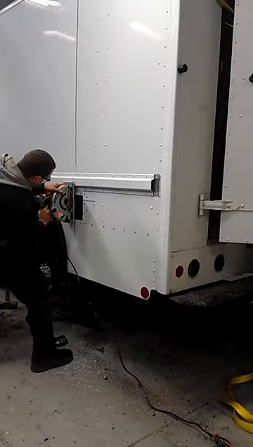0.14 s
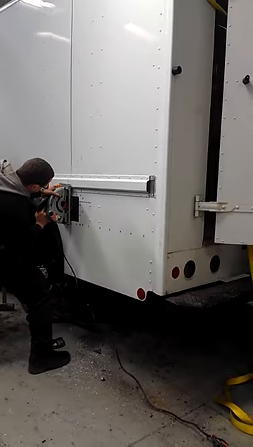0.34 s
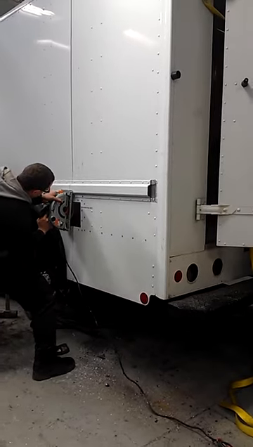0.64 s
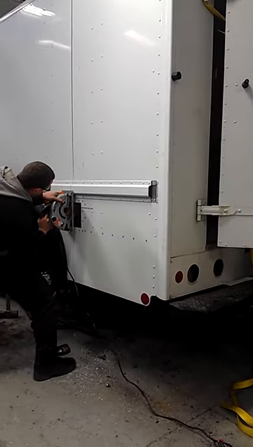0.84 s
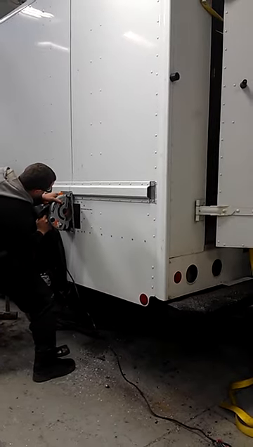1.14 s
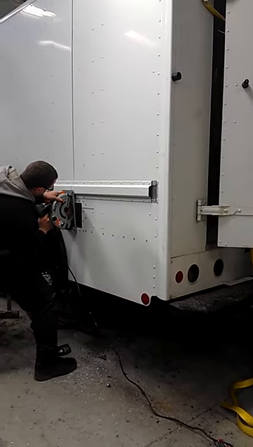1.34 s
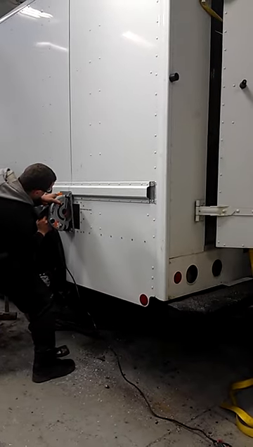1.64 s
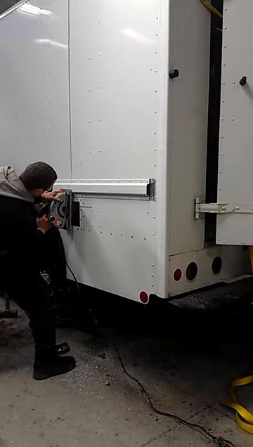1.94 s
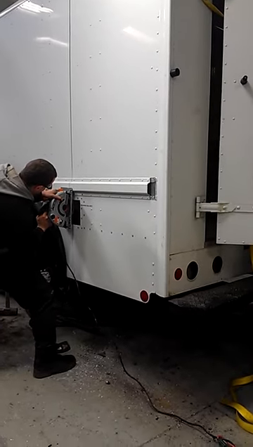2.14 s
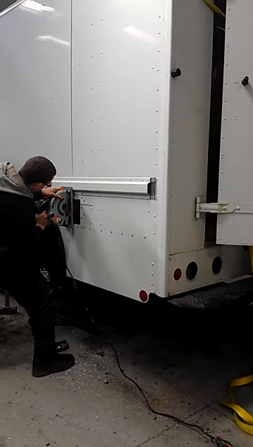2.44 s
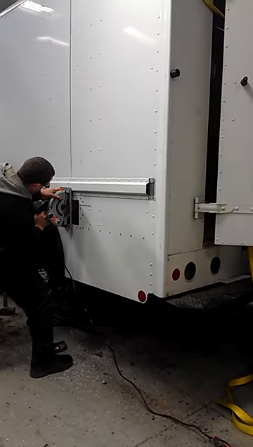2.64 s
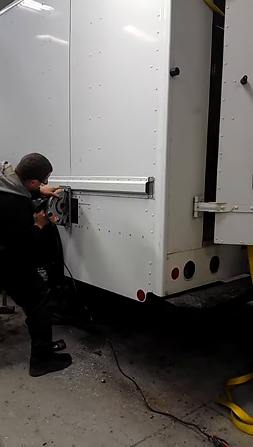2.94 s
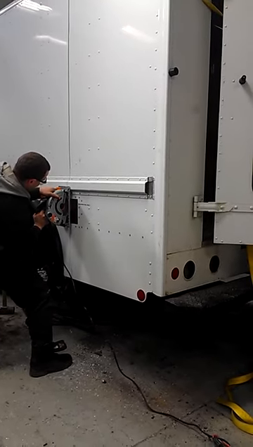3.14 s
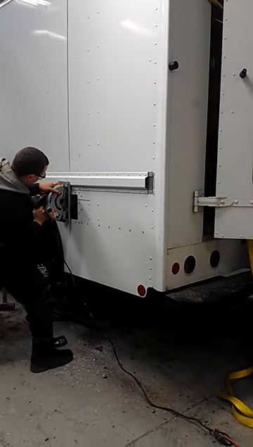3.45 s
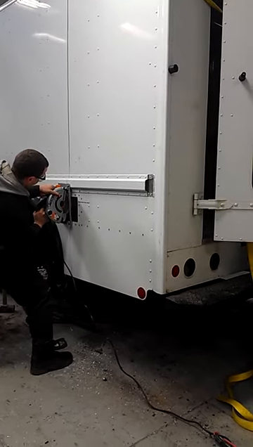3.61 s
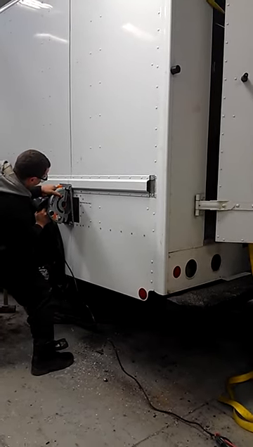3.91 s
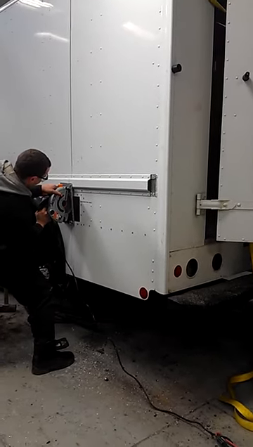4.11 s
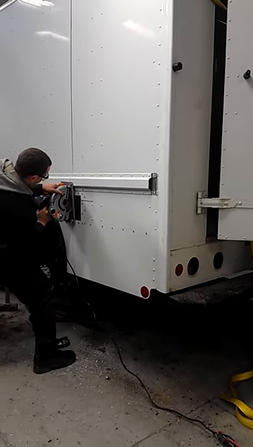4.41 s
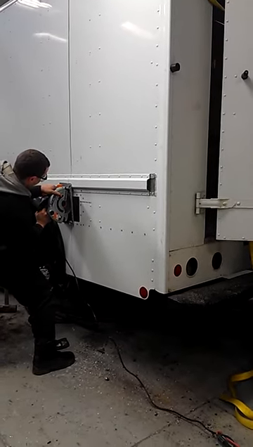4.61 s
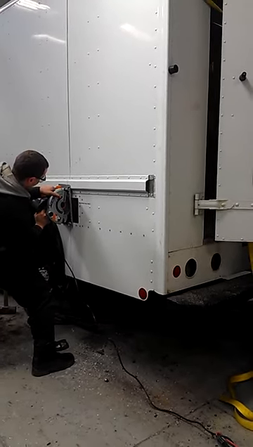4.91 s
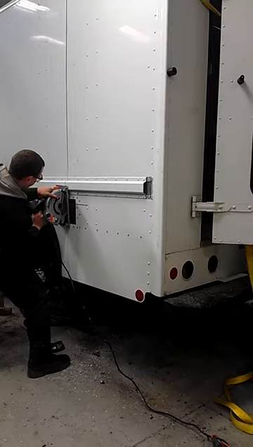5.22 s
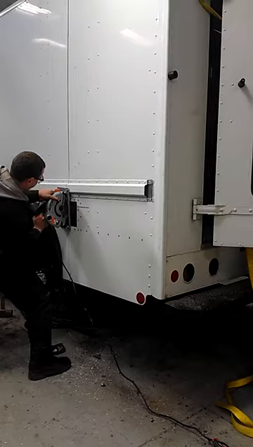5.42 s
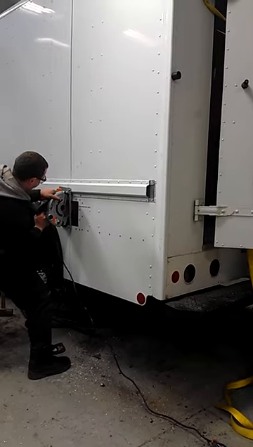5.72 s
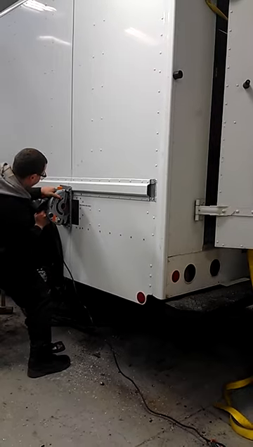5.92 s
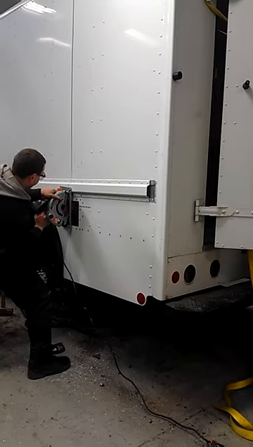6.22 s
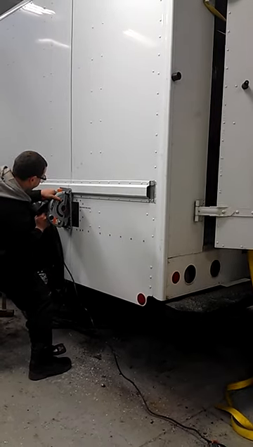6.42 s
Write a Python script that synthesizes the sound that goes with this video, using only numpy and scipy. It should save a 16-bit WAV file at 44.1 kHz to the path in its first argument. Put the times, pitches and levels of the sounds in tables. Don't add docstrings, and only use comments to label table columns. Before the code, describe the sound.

Low chugging compressor with a buzzing loose plate and one metallic tap, until a close circular saw kicks in and drowns it with shrill rushing whine.

```python
import sys
import numpy as np
from scipy import signal
from scipy.fft import rfft, irfft, next_fast_len
from scipy.io import wavfile
from scipy.ndimage import uniform_filter1d

SR = 44100
rng = np.random.default_rng(int(sys.argv[2]) if len(sys.argv) > 2 else 0)


def inscribe(sig):
    pcm = np.round(np.clip(np.atleast_2d(sig).T, -1, 1) * 32767)
    wavfile.write(sys.argv[1], SR, pcm.astype(np.int16))


def boost_factor(decibels):
    exponent = np.asarray(decibels, float) / 20
    return 10 ** exponent


N = 289296
TIME_S = np.arange(N) / SR


def rms_one(x):
    return x / np.sqrt(np.mean(x ** 2) + 1e-20)


def in_time(rows):
    s, *columns = np.transpose(rows)
    return [np.interp(TIME_S, s, column) for column in columns]


def drift(rate_hz, count=1):
    pole = np.exp(-128 * np.pi * rate_hz / SR)
    noise = rng.standard_normal((count, N // 64 + 1002))
    slow = signal.lfilter([1], [1, -2 * pole, pole * pole], noise)[:, 1000:]
    steps = np.repeat(slow / slow.std(axis=1, keepdims=True), 64, axis=1)
    return uniform_filter1d(steps, size=64)[:, :N].squeeze()


def resonance(x, hz, width_hz):
    r = np.exp(-np.pi * width_hz / SR)
    feed = np.array([1, 0, -1]) * (1 - r * r) / 2
    return signal.lfilter(feed, [1, -2 * r * np.cos(2 * np.pi * hz / SR), r * r], x + 1e-18)


def coloured(spectrum):
    hz, db = np.transpose(spectrum)
    size = next_fast_len(N)
    shape_db = np.interp(np.log(np.fft.rfftfreq(size, 1 / SR) + 1), np.log(hz), db)
    white = rfft(rng.standard_normal(size))
    return rms_one(irfft(white * boost_factor(shape_db), size)[:N])


def band(x, low_hz, high_hz):
    sos = signal.butter(2, [low_hz, high_hz], "band", fs=SR, output="sos")
    return rms_one(signal.sosfilt(sos, x))


def since(start_s, rise=.004):
    return np.clip((TIME_S - start_s) / rise, 0, 1)


def blow(start_s, db, rise, t60):
    decay_s = np.maximum(TIME_S - start_s - rise, 0)
    return boost_factor(db - 60 * decay_s / t60) * since(start_s, rise)


def swells(rows, rest_db):
    t = np.arange(0, N / SR + .01, .005)
    power = boost_factor(2 * rest_db)
    for middle_s, half_s, db in rows:
        power = power + boost_factor(2 * db) * np.exp(-((t - middle_s) / half_s) ** 4)
    return np.interp(TIME_S, t, 10 * np.log10(power))


def tone(hz, db, wobble_hz, flicker_db):
    phase = 2 * np.pi * np.cumsum(hz + wobble_hz * drift(30)) / SR
    return np.sqrt(2) * boost_factor(db + flicker_db * drift(15)) * np.sin(phase)


TURNS_PER_S = 11.94
# time_s, late_ms
CRANK_SLIP = [(0, .3), (.4, .4), (.9, -.6), (1.5, -1.6), (2.25, -.2), (2.6, -.8), (3.3, .5)]
# turn_share, level_db, pitch_hz, length_ms
INTAKE_PUFFS = [(.02, -23, 230, 4.0), (.17, -19.5, 245, 4.0), (.33, -22, 205, 4.0), (.487, -18, 230, 3.5),
                (.428, -21, 200, 3.5), (.70, -22, 290, 6.0)]
# order_multiple, level_db
FRAME_HUM = [(8, -52), (10, -42), (11, -47), (16, -31), (20, -38), (25, -36), (33, -42), (41, -44),
             (47, -48), (57, -43), (62, -51), (85, -50)]
# pitch_hz, density_db
SHOP_COLOUR = [(30, -40), (100, -21), (170, -4), (215, 0), (320, -1), (450, -7), (760, -6), (1000, -8),
               (1650, -16.5), (1950, -13), (3000, -22), (4100, -17), (7800, -18.5), (11500, -34),
               (14000, -56)]


def compressor(uneven_db, rush_db, breath):
    turns = TURNS_PER_S * (TIME_S - in_time(CRANK_SLIP)[0] / 1000)
    puffs, flow = 0, 0
    for share, db, hz, ms in INTAKE_PUFFS:
        turn = np.round(turns - share)
        t = (turns - share - turn) / TURNS_PER_S
        strength = boost_factor(db + uneven_db * rng.standard_normal(90))[turn.astype(int)]
        swell = strength * np.exp(-.5 * (1000 * t / ms) ** 2)
        puffs = puffs + swell * np.cos(2 * np.pi * hz * t)
        flow = flow + swell
    hum = 0
    for order, db in FRAME_HUM:
        hum = hum + np.sqrt(2) * boost_factor(db) * np.cos(2 * np.pi * round(order) * (turns - .487))
    rush = coloured(SHOP_COLOUR) * boost_factor(rush_db + .8 * drift(8))
    rush = rush * (1 + breath * (rms_one(flow) - .8))
    return puffs + hum * boost_factor(1.5 * drift(4)) + rush


# turn_share, peak_db
PLATE_SHAKES = [
    (.52, -15.5),
    (.02, -19),
]
STUCK_TURNS = [1, 3, 9, 13, 16, 35, 36]
# start_s, peak_db
PLATE_JOLTS = [
    (.5462, -15),
    (.7148, -16),
    (1.0475, -10),
    (1.5504, -15),
    (1.7549, -14),
    (1.8866, -15),
    (2.0537, -16),
    (2.3087, -16),
    (2.8908, -8),
]
# pitch_hz, density_db
RATTLE_COLOUR = [(1500, -30), (2000, -16), (3000, -16), (4100, -8), (4800, -11), (5400, -7), (5900, -11),
                 (6300, -6), (6900, -9), (7750, 2), (8500, -9), (9300, -12), (11000, -21), (14000, -36)]


def rattle(t60, offset_db):
    spread_db, jitter_ms, stuck_db = 1.8, 2.5, -5
    turns, hits = np.arange(78), np.zeros(N)
    for k, (share, db) in enumerate(PLATE_SHAKES):
        late, strength = rng.standard_normal((2, len(turns)))
        s = (turns + share) / TURNS_PER_S + jitter_ms / 1000 * late
        stuck = stuck_db * np.isin(turns, STUCK_TURNS) * (k == 0)
        at = np.maximum(s * SR - 100, 0).astype(int)
        hits[at] += boost_factor(2 * (db + stuck + spread_db * strength + offset_db))
    for s, db in PLATE_JOLTS:
        hits[int(s * SR) - 100] += boost_factor(2 * (db + offset_db))
    power = signal.lfilter([1], [1, -boost_factor(-120 / (t60 * SR))], hits)
    power = signal.lfilter([.014], [1, -.986], power)
    return np.sqrt(power) * coloured(RATTLE_COLOUR)


# start_s, depth_db, release_s
GAIN_DIPS = [
    (1.05, 6, .14),
    (2.895, 2, .2),
]
# time_s, level_db
GAIN_SWAY = [
    (3.44, 7),
    (3.52, 4.5),
    (3.7, 2.5),
    (4.0, 1),
    (4.9, .3),
    (5.4, -.7),
    (5.8, -2),
    (6.2, 1),
    (6.56, 0),
]


def ducking():
    db = -2.5 * np.exp(-TIME_S / .1)
    for s, depth_db, release_s in GAIN_DIPS:
        recovery = np.exp(-np.maximum(TIME_S - s, 0) / release_s)
        db = db - depth_db * since(s, rise=.03) * recovery
    under_saw_db = -33.5 + 1.8 * in_time(GAIN_SWAY)[0]
    return boost_factor(db + since(3.405, rise=.02) * under_saw_db)


# pitch_hz, density_db
TAP_COLOUR = [(500, -13), (1200, -9), (2200, -5), (3300, -3), (4200, 0), (5500, -8), (7900, -13),
              (11200, -33), (14000, -50)]
# pitch_hz, density_db
KICK_COLOUR = [(120, -44), (200, -14), (421, -19), (715, 1), (900, -13), (1040, -5), (1330, -16),
               (2420, -11), (2890, -16), (3910, -5), (4350, -11), (4800, -5), (5400, -11), (7930, -11),
               (13700, -29)]
# pitch_hz, level_db, t60_s
WALL_MODES = [(655, -25, .3), (716, -23, .35), (765, -26, .25), (1082, -26, .3), (2100, -29, .25),
              (3850, -30, .1), (4775, -27, .12)]


def wall():
    kick_s = 3.4115
    tap = blow(1.0445, -15.5, rise=.001, t60=.12) + blow(1.0445, -21.5, rise=.004, t60=.9)
    kick = blow(kick_s, -7.5, rise=.003, t60=.13) + blow(3.422, -12.5, rise=.003, t60=.05)
    jolt = blow(kick_s - .007, 0, rise=.002, t60=.05) * rng.standard_normal(N)
    ringing = 0
    for hz, db, t60 in WALL_MODES:
        mode = resonance(jolt, hz, np.log(1000) / np.pi / t60)
        ringing = ringing + boost_factor(db + 7.5) * mode / np.abs(mode).max()
    thud = blow(kick_s - .008, -21, rise=.006, t60=.08) * band(rng.standard_normal(N), 170, 350)
    return thud + tap * coloured(TAP_COLOUR) + kick * coloured(KICK_COLOUR) + ringing


# pitch_hz, density_db
RUSH_COLOUR = [(100, -56), (200, -30), (400, -19), (776, -11), (1370, -11), (2110, -5), (3200, -6),
               (3700, -2), (5240, -4), (7500, -3), (9060, -6.5), (11600, -22), (13000, -26), (14000, -40)]
# low_hz, high_hz, level_db, sway_share
RUSH_BANDS = [
    (150, 1500, -34, 1.3),
    (1500, 3400, -31, 1.1),
    (3400, 8500, -24.6, .25),
    (8500, 16000, -31.5, -.25),
]


def saw_rush():
    out, (sway_db,) = 0, in_time(GAIN_SWAY)
    for low_hz, high_hz, db, share in RUSH_BANDS:
        level_db = db - .7 + share * sway_db + .7 * drift(7)
        out = out + boost_factor(level_db) * band(coloured(RUSH_COLOUR), low_hz, high_hz)
    return out


# pitch_hz, width_hz, level_db
BLADE_MODES = [(2051, 18, -47), (2750, 60, -46), (3530, 60, -46), (3800, 120, -43), (4032, 18, -47),
               (5453, 18, -44), (5943, 60, -45), (6255, 18, -45), (6584, 22, -46), (6821, 18, -46),
               (7106, 18, -48), (7704, 30, -44), (7849, 22, -42), (8086, 110, -41), (8678, 25, -47),
               (8840, 100, -42), (9211, 60, -46), (9803, 110, -46), (10207, 60, -50), (10450, 60, -54),
               (10650, 100, -52), (11149, 40, -55), (11780, 90, -54), (12550, 60, -58), (12750, 80, -57),
               (13050, 80, -56), (13450, 80, -61)]
# pitch_hz, level_db
ROTOR_TONES = [
    (894, -50),
    (1065, -49),
]


def blade_and_rotor(air):
    out, spun_up = 0, since(3.43, rise=.2)
    for (hz, width_hz, db), flicker in zip(BLADE_MODES, drift(2.5, count=len(BLADE_MODES))):
        mode = resonance(resonance(air, hz, width_hz), hz, width_hz)
        out = out + spun_up * boost_factor(db + 1.1 + 2.6 * flicker) * rms_one(mode)
    for hz, db in ROTOR_TONES:
        mode = resonance(resonance(air, hz, width_hz=9), hz, width_hz=9)
        out = out + boost_factor(db + 3.5 * drift(1.5)) * rms_one(mode) * since(4.0, rise=.6)
    return out


# pitch_hz, resting_db
GUARD_AND_MOTOR_TONES = [(4490, -44), (4590, -46), (3594, -50), (5452, -52), (446, -60)]
# middle_s, half_length_s, level_db
GUARD_AND_MOTOR_SWELLS = [
    [(3.78, .1, -36), (4.35, .1, -39), (4.92, .16, -37), (5.97, .38, -36)],
    [(4.15, .13, -33.5), (4.5, .04, -39), (5.33, .06, -37), (6.05, .4, -40.5)],
    [(4.45, .08, -46), (6.17, .25, -35)],
    [(5.55, .15, -40), (6.25, .12, -42)],
    [(4.7, .45, -53), (5.5, .12, -56), (6.25, .2, -51)],
]


def guard_and_motor():
    out = 0
    for (hz, rest_db), rows in zip(GUARD_AND_MOTOR_TONES, GUARD_AND_MOTOR_SWELLS):
        out = out + tone(hz, swells(rows, rest_db), wobble_hz=5.0, flicker_db=2.1)
    return out * since(3.65, rise=.1)


# middle_s, half_length_s, level_db
WHINE_SWELLS = [(3.67, .055, -27.5), (3.81, .065, -25.5), (4.0, .12, -36), (4.87, .08, -38),
                (5.15, .2, -30.5), (5.6, .06, -35), (6.05, .28, -29.5), (6.52, .08, -33)]
# middle_s, half_length_s, level_db
WHISTLE_SWELLS = [(4.07, .08, -28), (4.4, .14, -29), (4.74, .18, -30.5), (5.33, .2, -31), (5.85, .22, -34),
                  (6.2, .1, -35), (6.5, .1, -32)]


def gear_and_whistle():
    slow = np.exp(-np.maximum(TIME_S - 3.62, 0) / .3)
    gear_hz, whistle_hz = 3743 - 190 * slow, 7305 - 150 * slow
    whine = tone(gear_hz, swells(WHINE_SWELLS, rest_db=-41), wobble_hz=4.0, flicker_db=1.3)
    whistle = tone(whistle_hz, swells(WHISTLE_SWELLS, rest_db=-43), wobble_hz=8.0, flicker_db=3.6)
    return whine * since(3.615, rise=.02) + whistle * since(3.93, rise=.05)


# time_s, pitch_hz, level_db
FAN_RUN_UP = [
    (3.42, 2050, -39),
    (3.55, 2150, -34),
    (3.8, 2300, -35),
    (4.05, 2500, -37),
    (4.3, 2650, -42),
    (4.8, 2750, -60),
]


def cooling_fan(air):
    fan_hz, fan_db = in_time(FAN_RUN_UP)
    spin = 2 * np.pi * np.cumsum(fan_hz) / SR
    swish = rms_one(signal.sosfilt(signal.butter(4, 90, fs=SR, output="sos"), air))
    return boost_factor(fan_db + 4) * swish * (np.sin(spin) + boost_factor(-4) * np.sin(2 * spin))


def saw():
    air = rng.standard_normal(N)
    out = saw_rush() + blade_and_rotor(air) + guard_and_motor() + gear_and_whistle() + cooling_fan(air)
    return out * since(3.415, rise=.02)


def scene():
    shop = compressor(uneven_db=3.1, rush_db=-23.2, breath=.15) + rattle(t60=.2, offset_db=-9.3)
    mono = ducking() * shop + wall() + saw()
    return np.array([mono, mono])


def delayed(x, lag):
    return np.concatenate([np.zeros(lag), x[:-lag]])


def low_pass(x):
    return signal.sosfilt(signal.butter(12, 13900, fs=SR, output="sos"), x)


def record(dry):
    mid = signal.sosfilt(signal.butter(2, 45, "high", fs=SR, output="sos"), dry[0])
    bass = signal.lfilter(*signal.butter(1, 600, fs=SR), mid)
    between = signal.resample_poly(mid, 2, 1)[1::2]
    side = .72 * delayed(between, 72) + .3 * delayed(bass, 52)
    echo = delayed(mid, 1790)
    side += .36 * signal.lfilter(*signal.butter(1, 900, "high", fs=SR), echo)
    stereo = np.array([mid - side, mid + side])
    return low_pass(1.3 * np.tanh(stereo / 1.3))


dry = scene()
out = record(dry)
inscribe(out)
```